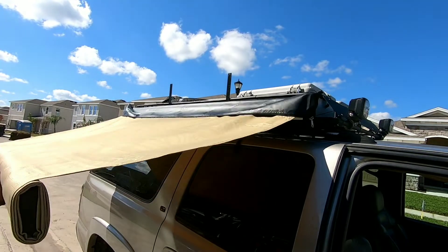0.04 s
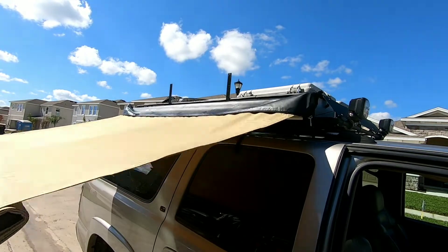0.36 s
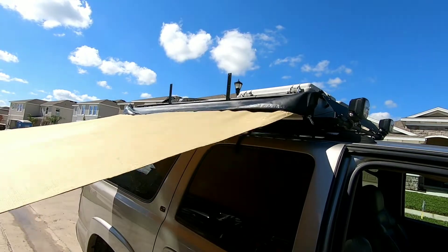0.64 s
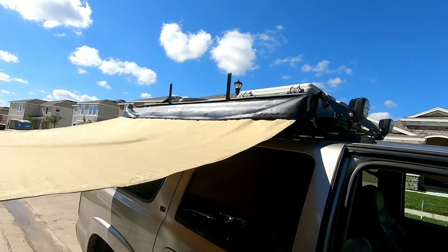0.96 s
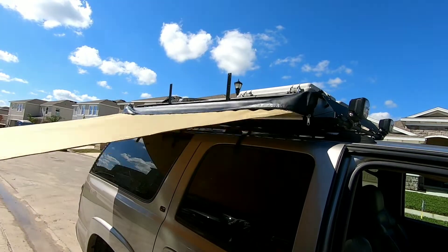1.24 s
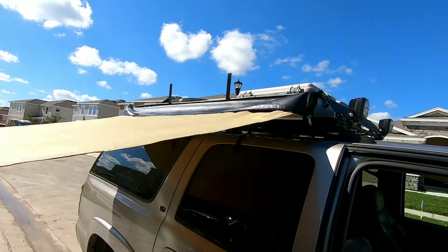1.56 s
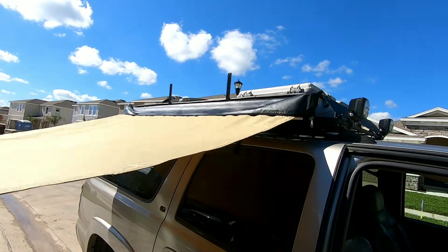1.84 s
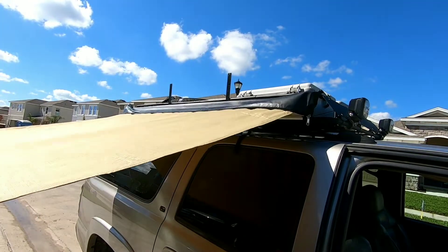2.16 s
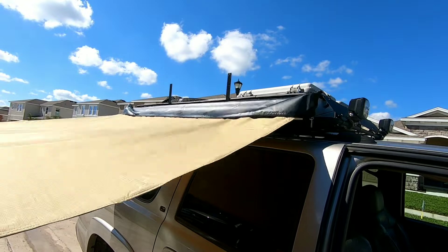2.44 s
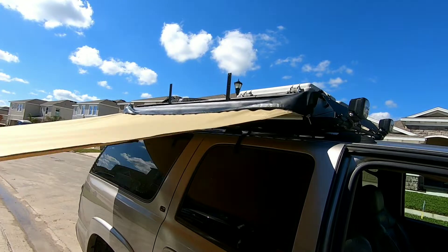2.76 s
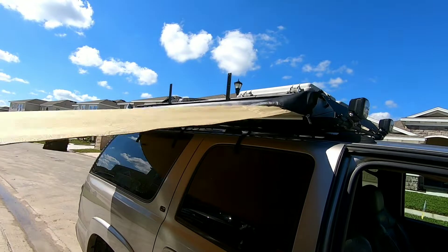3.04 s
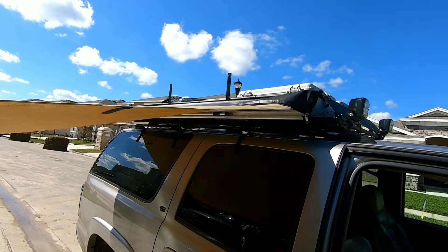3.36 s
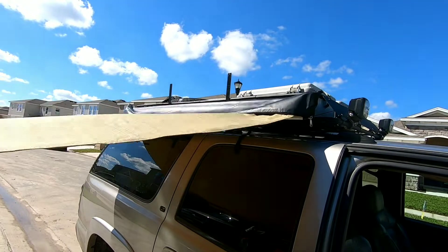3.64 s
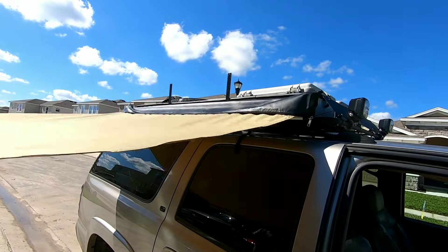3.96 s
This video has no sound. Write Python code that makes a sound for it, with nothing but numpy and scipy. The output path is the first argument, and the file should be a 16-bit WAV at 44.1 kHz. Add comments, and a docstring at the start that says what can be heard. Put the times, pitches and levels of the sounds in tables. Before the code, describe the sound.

A canvas awning flaps and rustles in gusts, with wind rumbling on the microphone.

```python
"""Car awning in gusty wind

A canvas awning, pulled out from the roof of a parked car, billows. The cloth rustles and swishes, flaps as it
fills and snaps as it goes taut; the awning rail hums briefly; a metal fitting ticks. Wind throbs on the
microphone about 13 times a second, mostly on the right port."""
import sys
import numpy as np
from scipy.fft import rfft, irfft, next_fast_len
from scipy.io import wavfile
from scipy.ndimage import uniform_filter1d, map_coordinates

SR = 44100
rng = np.random.default_rng(int(sys.argv[2]) if len(sys.argv) > 2 else 0)


def generate_wav(signal):
    """Clip the signal to [-1, 1] and save it as 16-bit WAV at the path in sys.argv[1]."""
    frames = np.transpose(np.atleast_2d(signal))
    scaled = np.clip(frames, -1, 1) * 32767
    pcm = np.round(scaled).astype(np.int16)
    wavfile.write(sys.argv[1], SR, pcm)


N = 176400


def amp(db):
    """Decibels to gain."""
    return 10 ** (np.asarray(db) / 20)


def unit(x):
    """Scale to rms 1."""
    return x / np.sqrt(np.mean(x ** 2) + 1e-20)


def along(points, hz):
    """Interpolate (f/Hz, value) points on a log axis."""
    f, v = np.transpose(points)
    return np.interp(np.log(hz + 1), np.log(f + 1), v)


def clock():
    """Sample times in seconds."""
    return np.arange(N) / SR


def curve(points):
    """Interpolate (t/s, value) points at each sample."""
    return np.interp(clock(), *np.transpose(points))


def wobble(knots_per_s):
    """Smooth random curve."""
    return map_coordinates(rng.standard_normal(2048), [clock() * knots_per_s + 2], mode="wrap")


def swell(t, rise_s, fall_s):
    """Exponential rise and fall, peak at t = 0."""
    return np.exp(np.minimum(t / rise_s, -t / fall_s))


def filtered(x, response):
    """Apply a complex frequency response."""
    size = next_fast_len(N + SR // 2)
    return irfft(rfft(x, size) * response(np.fft.rfftfreq(size, 1 / SR)), size)[..., :N]


def coloured(x, colour):
    """Shape x by a spectrum; rms 1."""
    return unit(filtered(x, lambda hz: amp(along(colour, hz))))


def peaked(colour, pitch_hz, width_oct, skirt_db):
    """Response: a spectrum times one peak on a flat skirt."""
    peak = lambda hz: np.exp(-(np.log2((hz + 1) / pitch_hz) / width_oct) ** 2)
    return lambda hz: amp(along(colour, hz)) * (amp(skirt_db) + peak(hz))


def street_air():
    """Quiet, steady outdoor noise."""
    # air spectrum: f/Hz, level/dB
    colour = [(30, -10.5), (160, -0.5), (300, 7), (900, 7.5), (3000, -1.5), (5000, -7.5), (9000, -16),
              (11500, -24.5), (15000, -35)]
    return amp(-71) * coloured(rng.standard_normal((2, N)), colour)


def wind():
    """Air pushes and pulls on the ports, more sharply in gusts; pushes stir a burr, eddies rumble."""
    # wind strength at the microphone: t/s, level/dB
    gusts = [(0.03, -49.5), (0.15, -66), (0.36, -45.5), (0.6, -58.5), (0.66, -75), (0.77, -49.5),
             (0.92, -107), (1.16, -62.5), (1.27, -50), (1.59, -76), (1.74, -45.5), (1.99, -45.5),
             (2.21, -49.5), (2.24, -56), (2.41, -47.5), (2.58, -58.5), (2.66, -61), (2.69, -61),
             (2.74, -53.5), (2.93, -47.5), (2.99, -88), (3.13, -61), (3.39, -83), (3.5, -54), (3.55, -59),
             (3.65, -50.5), (3.81, -48.5), (3.84, -57), (3.93, -46), (4.0, -58)]
    # throb rate: t/s, f/Hz
    throb_rate = [(0, 13.1), (1.2, 13.1), (1.5, 14.1), (1.8, 13.4), (2.3, 13.4), (2.6, 14.4), (3.0, 13.7),
                  (4, 13.4)]
    # throb partials: multiple, level/dB at gust_ref_db, growth/(dB per dB of gust)
    throb_orders = [(1, -44, 0.43), (3, -43.5, 1.78), (5, -42, 1.75), (7, -61, 5.1)]
    # eddy spectrum: f/Hz, level/dB
    eddy_colour = [(10, 6), (25, -7), (45, 6), (70, -4.5), (90, -17.5), (130, -17.5), (400, -55),
                   (2000, -102)]
    # low burr envelope: t/s, level/dB
    burr_levels = [(.03, -62.5), (.19, -70), (.24, -56.5), (.4, -59.5), (.5, -69.5), (1.1, -83),
                   (1.25, -65), (1.58, -79), (1.66, -61), (1.73, -50), (1.97, -50), (2.06, -56.5),
                   (2.2, -60.5), (2.44, -57), (2.6, -69.5), (2.7, -68), (2.83, -61), (3.0, -69.5),
                   (3.4, -71.5), (3.64, -61), (3.85, -63), (4, -63.5)]
    # burr noise spectrum: f/Hz, level/dB
    burr_colour = [(40, -18), (100, 6.5), (190, -5), (240, -1.5), (300, -10), (450, -23.5), (1000, -62),
                   (4000, -58)]
    # burr partials: multiple of the throb rate, level/dB
    burr_orders = [(10, -7.5), (12, 0), (18, -21.5)]
    gust_ref_db, calm_db, burr_ref_db = -43, -71.5, -47
    smooth_s, first_push_s, drift_rad = .06, .071, .45

    strength = uniform_filter1d(amp(curve(gusts)), size=int(smooth_s * SR)) + amp(calm_db)
    gust_db = 20 * np.log10(strength) - gust_ref_db
    rate_hz = curve(throb_rate)
    phase = 2 * np.pi * (np.cumsum(rate_hz) / SR - first_push_s * rate_hz[0])

    def partial(k):
        return np.sqrt(2) * np.cos(k * phase + drift_rad * wobble(9.1)) * amp(1.84 * wobble(17))

    throb = sum(amp(db + growth * gust_db) * partial(k) for k, db, growth in throb_orders)
    eddies = amp(gust_ref_db - 5.5 + .6 * gust_db) * coloured(rng.standard_normal((2, N)), eddy_colour)
    rumble = throb * amp([[-14], [0]]) + eddies * amp([[-5], [0]])

    burr_db = curve(burr_levels)
    pushes = .65 + np.cos(phase) ** 4
    stirred = coloured(rng.standard_normal((2, N)) * pushes, burr_colour)
    ring_db = burr_ref_db + 1.35 * (burr_db - burr_ref_db)
    ring = sum(amp(db) * partial(k) for k, db in burr_orders)
    burr = amp(burr_db + 2) * stirred + amp(ring_db + 3) * ring
    return amp(7) * rumble + burr * amp([[-10], [0]])


def hum():
    """The awning rail hums briefly, wavering."""
    # hum swells: t/s, level/dB, half-width/s
    swells = [(1.07, -59, .12), (2.6, -64, .08), (3.87, -62, .07)]
    pitch_hz = 187
    t = clock()
    envelope = sum(amp(db) * np.exp(-((t - at_s) / width_s) ** 2) for at_s, db, width_s in swells)
    tone = np.sin(2 * np.pi * pitch_hz * t + .61 * wobble(23))
    return envelope * tone * amp(1.7 * wobble(28.1))


def ticks():
    """A metal fitting ticks with a short, high ring."""
    # fitting ticks: t/s, level/dB, f/Hz
    hits = [(3.44, -66, 9000), (3.558, -61, 7713)]
    t60_s = .11
    t = clock()
    out = np.zeros(N)
    for at_s, db, hz in hits:
        envelope = swell(t - at_s, rise_s=.0005, fall_s=t60_s / np.log(1000))
        out += amp(db) * envelope * np.sin(2 * np.pi * hz * t + .5 * wobble(300))
    return out


def crinkle(rate_per_s, spread_db, friction):
    """Two independent streams of tiny creases buckling, over smooth friction noise."""
    impulses = (rng.random((2, N)) < rate_per_s / SR) * rng.choice([-1, 1], (2, N))
    sizes = amp(spread_db * np.minimum(rng.exponential(size=(2, N)), 4))
    return unit(unit(impulses * sizes) + friction * rng.standard_normal((2, N)))


def rustle():
    """Moving canvas crinkles; the level flutters slightly."""
    # cloth motion: t/s, level/dB
    levels = [(0, -52.5), (.17, -84), (.2, -56), (.39, -70), (.46, -50.5), (.59, -60), (.82, -48),
              (.9, -54.5), (1.0, -49), (1.16, -54.5), (1.35, -46.5), (1.5, -57.5), (1.58, -45.5),
              (1.9, -50), (2.15, -50.5), (2.33, -52), (2.62, -51.5), (2.79, -50.5), (3.1, -52.5),
              (3.28, -51), (3.62, -48.5), (3.8, -51), (4, -54)]
    # rustle spectrum: f/Hz, level/dB
    colour = [(60, -33), (170, 3.5), (320, 1), (490, 0.5), (600, 1), (800, 3.5), (1300, -5.5),
              (2000, -14.5), (3050, -12.5), (4000, -20.5), (6000, -32.5), (14000, -45)]
    envelope = amp(curve(levels) - 5.5 + 1.6 * wobble(45))
    return envelope * coloured(crinkle(rate_per_s=700, spread_db=4.5, friction=.65), colour)


def swish():
    """The weave slides over itself with a fine hiss; single creases prickle."""
    # cloth sliding: t/s, level/dB
    levels = [(0.03, -83.5), (0.17, -86), (0.19, -77), (0.34, -82), (0.86, -68), (0.89, -76), (0.98, -70.5),
              (1.18, -81.5), (1.34, -74), (1.51, -76.5), (1.6, -61), (1.69, -75.5), (1.78, -66),
              (1.91, -79), (2.13, -72), (2.17, -79.5), (2.2, -71), (2.64, -74.5), (2.71, -73),
              (2.73, -74.5), (2.98, -71.5), (3.0, -67), (3.28, -75.5), (3.57, -68.5), (3.59, -71),
              (3.68, -66.5), (3.76, -73.5), (3.92, -68.5), (3.94, -75), (4.0, -75.5)]
    # swish spectrum: f/Hz, level/dB
    colour = [(800, -42), (2000, 4.5), (3000, 2.5), (4000, -2.5), (5000, 2.5), (5800, 1), (6600, -7.5),
              (7500, -8), (10200, -3), (11500, -13), (14000, -16), (15000, -38)]
    flicker = amp(1.64 * wobble(60))
    hiss = coloured(crinkle(rate_per_s=1400, spread_db=4, friction=2.2), colour)
    prickle = coloured(crinkle(rate_per_s=45, spread_db=2.2, friction=0), colour)
    return amp(curve(levels) + 7.5) * (flicker * hiss + amp(-15) * prickle)


def flaps():
    """Each fold fills with air and rolls over with a hollow burst."""
    # folds filling: t/s, level/dB, f/Hz, rise/s, fall/s
    folds = [(.197, -57, 860, .008, 0.016), (0.511, -52, 1290, 0.011, 0.0091),
             (0.646, -45, 380, 0.0087, 0.011), (.708, -52, 1070, 0.014, 0.011),
             (.82, -52, 373, 0.047, 0.042), (0.984, -53.5, 510, 0.02, 0.011),
             (1.065, -42, 815, 0.0068, 0.018), (1.098, -46, 470, 0.0073, 0.014),
             (1.28, -50.5, 606, 0.0071, 0.0078), (1.46, -46.5, 626, 0.0061, 0.0082),
             (1.573, -47.5, 626, 0.034, 0.023), (1.622, -40, 840, 0.027, 0.02),
             (2.185, -43, 1070, .003, 0.015), (2.201, -45, 425, 0.011, 0.069),
             (2.263, -45, 1000, 0.012, 0.02), (2.39, -40, 880, 0.019, 0.012),
             (2.42, -40.5, 900, 0.019, 0.014), (2.557, -47.5, 573, 0.011, 0.01),
             (2.885, -41, 570, 0.017, 0.017), (3.024, -45.5, 760, 0.029, 0.031),
             (3.102, -44, 525, 0.023, 0.031), (3.461, -38.5, 670, 0.0062, 0.02),
             (3.491, -40.5, 490, 0.0071, 0.034), (3.522, -40, 570, 0.0072, 0.029),
             (3.913, -39.5, 750, .0025, 0.015)]
    # flap spectrum: f/Hz, level/dB
    colour = [(100, -13), (300, 4), (490, 4), (600, 2), (800, 3), (1400, -2.5), (2500, -13), (5000, -18.5),
              (14000, -39)]
    out = np.zeros((2, N))
    for at_s, db, pitch_hz, rise_s, fall_s in folds:
        hollow = peaked(colour, pitch_hz, width_oct=.36, skirt_db=-10)
        noise = unit(filtered(rng.standard_normal((2, N)), hollow))
        out += amp(db - 1) * swell(clock() - at_s, rise_s, fall_s) * noise
    return out


def snaps():
    """Cloth going taut releases a ringing cluster of creases; sudden snaps add a crack."""
    # cloth going taut: t/s, level/dB, f/Hz, rise/s, fall/s
    jerks = [(0.546, -52, 3300, 0.0028, 0.0099), (0.633, -47, 2130, .0015, 0.0069),
             (0.811, -51.5, 2220, 0.0066, 0.011), (1.075, -58.5, 2970, 0.036, 0.016),
             (1.528, -54.5, 3040, 0.0018, .014), (1.609, -48, 1660, 0.014, 0.015),
             (1.762, -56, 2820, 0.005, 0.061), (2.187, -53.5, 2050, .003, 0.066),
             (2.274, -46.5, 2420, 0.0011, 0.004), (2.385, -52.5, 2310, 0.032, 0.017),
             (2.692, -47, 2480, 0.01, 0.013), (2.708, -48, 2650, 0.0045, 0.0036),
             (3.002, -58, 3080, 0.0079, 0.18), (3.023, -43, 2050, 0.0034, 0.0035),
             (3.347, -53, 2380, .004, 0.017), (3.459, -47.5, 1810, 0.0044, .012),
             (3.531, -68, 2230, 0.037, 0.037), (3.913, -56, 2240, 0.0017, 0.0041)]
    # snap spectrum: f/Hz, level/dB
    colour = [(200, -40), (700, 17), (1500, 4.5), (2400, 3.5), (3100, 3.5), (4000, -8), (5600, -1.5),
              (7000, -13), (10000, -13.5), (14000, -52)]
    size, sudden_s = 2 ** 14, .0035
    t = (np.arange(size) - size // 2) / SR
    hz = np.fft.rfftfreq(size, 1 / SR)
    impulse = np.outer([1, 0], t == 0)  # first stream only
    out = np.zeros((2, N))
    for at_s, db, pitch_hz, rise_s, fall_s in jerks:
        ring = peaked(colour, pitch_hz, width_oct=.35, skirt_db=-2)
        crack = impulse * amp(23) * np.exp(-rise_s / sudden_s)
        creases = unit(rng.standard_normal((2, size)) * amp(5 * rng.standard_normal((2, size))))
        force = swell(t, rise_s, fall_s) * creases + crack
        burst = irfft(rfft(force) * unit(ring(hz)))
        start = round(at_s * SR) - size // 2
        out[:, start:start + size] += amp(db - 1) * burst[:, :N - start]
    return out


def cavity(x):
    """Reflections between cloth and car lift some bands and hollow out others."""
    # cavity peaks and dips: f/Hz, half-width/Hz, gain/dB
    bands = [(235, 25, -2.5), (316, 13.6, 3), (380, 15.6, 0), (501, 38, 3), (589, 37, -5), (613, 43, 2),
             (876, 27, 2), (952, 92, -2.5), (1420, 170, 1.5), (1510, 17, -4), (2830, 59, 1)]
    gain_db = lambda hz: sum(db * np.exp(-((hz - centre) / width) ** 2) for centre, width, db in bands)
    return filtered(x, lambda hz: amp(gain_db(hz)))


def ports(pair):
    """The cloth is on the left: the right port gets it duller and shifted in phase."""
    # right port re left: f/Hz, gain/dB
    right_gain = [(150, -10), (370, -9.5), (690, -4), (1260, 0.5), (3000, 0), (4200, -5), (5200, -19),
                  (8000, -12), (14000, -45)]
    # right port re left: f/Hz, phase lead/rad
    right_phase = [(100, 9.3), (430, 3.19), (1000, 2.613), (1800, 2.02), (2800, 1.5), (3900, 0.29),
                   (4800, .1)]
    # likeness of the ports: f/Hz, coherence (0-1)
    coherence = [(200, 1), (450, 0.96), (1000, 1), (2000, 0.85), (3500, .9), (4500, 0.66), (5200, 0.13)]

    def to_right(hz):
        alike = np.clip(along(coherence, hz), 0, 1)
        shift = amp(along(right_gain, hz)) * np.exp(1j * along(right_phase, hz))
        return shift * np.array([alike, np.sqrt(1 - alike ** 2)])

    return np.array([pair[0], filtered(pair, to_right).sum(0)])


def scene():
    """Street air, wind and awning, in stereo."""
    air = street_air()
    cloth = ports(cavity(rustle() + swish() + flaps() + snaps()))
    hum_and_ticks = (hum() + ticks()) * amp([[0], [-18]])  # on the left
    return air + wind() + hum_and_ticks + cloth


def record(dry):
    """Brick-wall low-pass."""
    top_hz = 14900
    return filtered(dry, lambda hz: hz < top_hz)


dry = scene()
out = record(dry)
generate_wav(out)
```